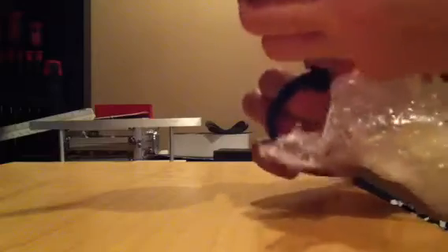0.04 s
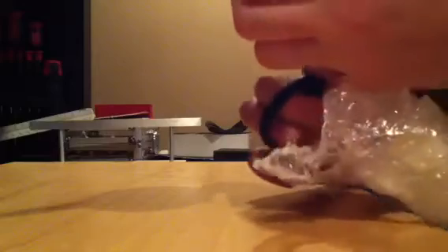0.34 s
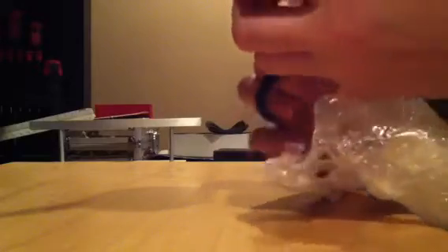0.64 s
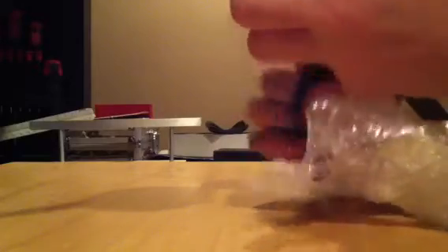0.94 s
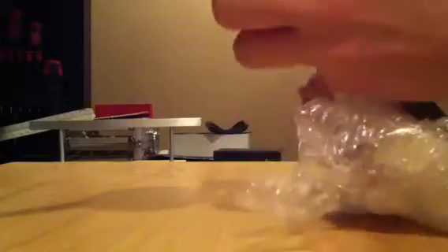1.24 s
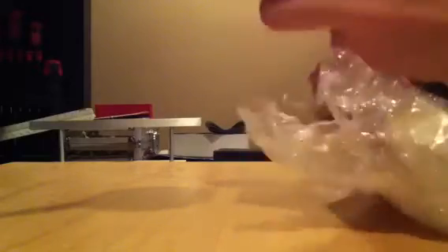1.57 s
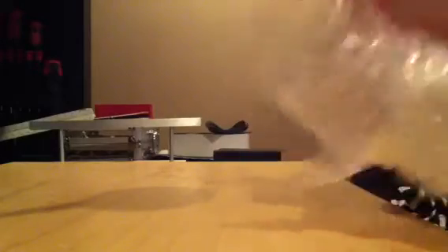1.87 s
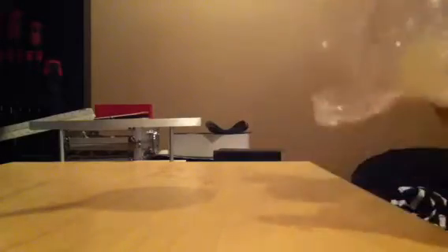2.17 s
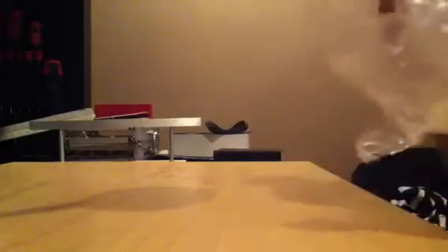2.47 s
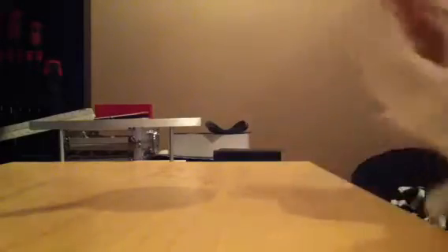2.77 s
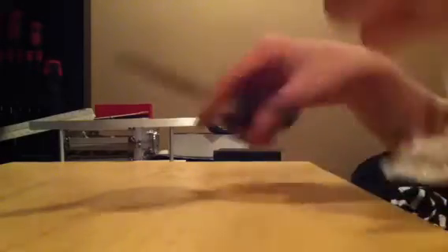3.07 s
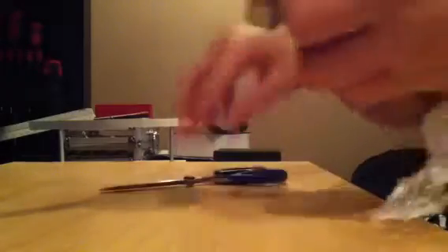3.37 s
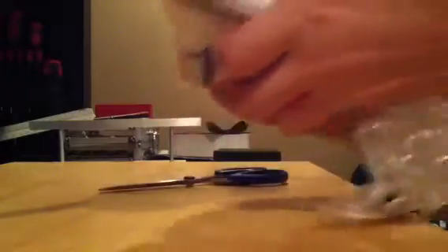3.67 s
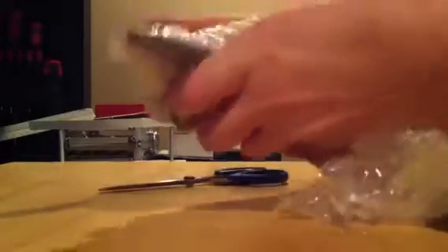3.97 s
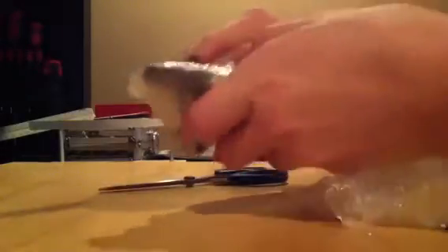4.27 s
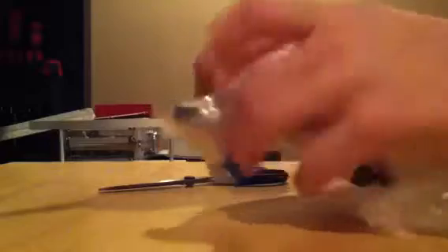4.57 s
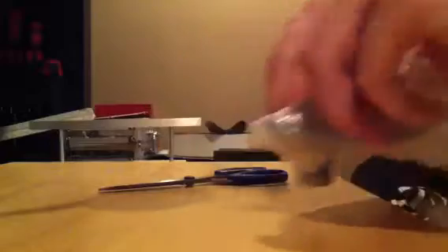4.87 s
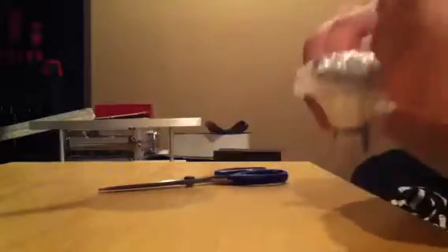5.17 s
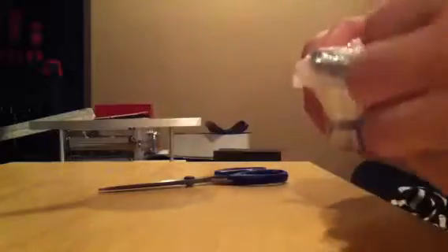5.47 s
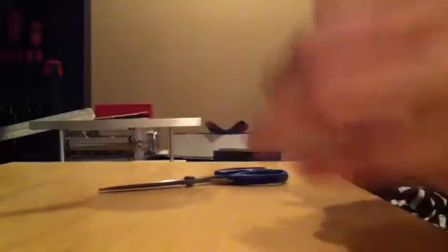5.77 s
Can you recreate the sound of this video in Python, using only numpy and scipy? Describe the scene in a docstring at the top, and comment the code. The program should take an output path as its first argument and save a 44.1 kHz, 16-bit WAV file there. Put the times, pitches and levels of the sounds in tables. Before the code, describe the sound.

Hands work plastic wrap off a metal rail, making a soft crinkle dotted with sharp snaps. Early on, the wrapped rail bumps and drags dully on a wooden table. Midway, scissors drop on the wood with a quick clinking clatter, then the crinkling returns louder and crisper. It is all close to the microphone in a small, quiet room with soft ventilation and a faint appliance whine.

```python
"""A small, quiet room with a wooden table, where hands work clear plastic wrap off a metal rail.
The film rustles with dense tiny buckles, snaps as creases pop through and rasps under the fingers;
the wrapped rail bumps and drags on the table. Midway a pair of scissors drops on the wood, its blades
clinking, and clatters to rest. Soft ventilation and a faint appliance whine lie underneath."""
import sys
import numpy as np
from scipy import signal
from scipy.fft import rfft, irfft
from scipy.io import wavfile

SR = 44100
rng = np.random.default_rng(int(sys.argv[2]) if len(sys.argv) > 2 else 0)


def log_audio(samples):
    """Write samples as a 16-bit WAV file to the path given in sys.argv[1]."""
    # one column per channel
    frames = np.atleast_2d(samples).T
    # limit to full scale, then quantise
    limited = np.clip(frames, -1, 1)
    pcm = np.round(limited * 32767).astype(np.int16)
    wavfile.write(sys.argv[1], SR, pcm)


N = 256662
T = np.arange(N) / SR
RING_T = T[:SR // 4]  # time axis of a single hit

# modes of the wooden table top: (frequency [Hz], level [dB], t60 [s])
TABLE_MODES = [(120, -12, 0.31), (165, -5.5, 0.18), (228, -6, 0.3), (269, 3.5, 0.088), (333, 4.5, 0.14),
               (416, 2, 0.078), (674, -8, 0.12), (710, -2, .1), (830, 0, 0.25), (915, -7, 0.38),
               (987, -11, 0.23), (1100, -16, 0.18), (1445, -12, 0.096), (1390, 13, 0.092),
               (1780, -11, 0.12), (1976, 14.5, 0.14), (2470, 10, 0.12)]


def undb(db):
    """Decibels to gain."""
    return 10 ** (np.asarray(db) / 20)


def unit(x):
    """Scale to rms 1."""
    return x / np.sqrt(np.mean(x ** 2))


def unit_hit(x):
    """Scale a hit to rms 1 over its first 10 ms."""
    return x / np.sqrt(np.mean(x[:SR // 100] ** 2))


def fade(t60):
    """Exponential decay, 60 dB down after t60 seconds."""
    return np.exp(-np.log(1000) * RING_T / t60)


def band(x, hz, kind, order=2):
    """Butterworth filter."""
    return signal.lfilter(*signal.butter(order, np.minimum(hz, SR / 2.2), kind, fs=SR), x)


def colour(x, points, size=4096):
    """Minimum-phase EQ through points of (frequency [Hz], gain [dB])."""
    hz, db = np.transpose(points)
    bin_hz = np.fft.rfftfreq(size, 1 / SR)
    gain = undb(np.interp(np.log(bin_hz + 1), np.log(hz), db))
    cepstrum = irfft(np.log(gain))
    cepstrum[1:size // 2] *= 2
    cepstrum[size // 2 + 1:] = 0
    return signal.fftconvolve(x, irfft(np.exp(rfft(cepstrum))))[:len(x)]


def wander(rate):
    """Random drift of rms 1 that turns `rate` times a second."""
    knots = rng.standard_normal(int(N / SR * rate) + 2)
    return unit(np.interp(T * rate, np.arange(len(knots)), knots))


def ring(modes, scatter_db):
    """Decaying modes; each point of contact weights them differently."""
    sizes = undb(scatter_db * rng.standard_normal(len(modes))) * rng.choice([-1, 1], len(modes))
    return sum(size * undb(db) * fade(t60) * np.sin(2 * np.pi * hz * RING_T)
               for size, (hz, db, t60) in zip(sizes, modes))


def burst(t60):
    """Decaying noise: countless close modes that die away together."""
    return rng.standard_normal(len(RING_T)) * fade(t60)


def ping(hz, cycles):
    """One short resonance that falls to 1/e in the given number of cycles."""
    t = RING_T[:SR // 30]
    return np.sin(2 * np.pi * hz * t) * np.exp(-hz * t / cycles)


def add(track, s, sound):
    """Mix a sound into a track at s seconds."""
    i = max(int(s * SR), 0)
    track[i:i + len(sound)] += sound[:N - i]


def room_tone():
    """A bed of soft ventilation noise with the thin, slightly wavering whine of an appliance."""
    # tone of the ventilation: (frequency [Hz], gain [dB])
    air_eq = [(25, -12), (60, -21.5), (110, -7), (150, -12), (270, 5), (400, -4.5), (600, -1.5),
              (850, -8.5), (1100, -8), (1300, -11.5), (2100, -17.5), (4000, -20.5), (13000, -58),
              (16000, -23)]
    air = unit(colour(rng.standard_normal(N), air_eq)) * undb(-58.5 + 0.23 * wander(20))
    whine_hz = 1119 + 5 * wander(50)
    whine = unit(np.sin(2 * np.pi * np.cumsum(whine_hz) / SR))
    return air + whine * undb(-68 + 1.5 * wander(30))


def hand_effort():
    """Envelope of the rustle in dB: steady handling plus tugs that build, hold and let go."""
    # how hard the hands work the film: (time [s], level [dB])
    handling = [(0.0, -71), (0.2, -71.5), (0.38, -69.5), (0.44, -61.5), (0.6, -65.5), (0.68, -61),
                (1.25, -56), (1.56, -57.5), (2.0, -55.5), (2.33, -58), (2.41, -67.5), (2.56, -60.5),
                (2.92, -68.5), (3.3, -70), (3.65, -67), (3.75, -52.5), (4.36, -49.5), (4.44, -57),
                (4.52, -46), (4.77, -56.5), (5.0, -49), (5.2, -47), (5.58, -47), (5.67, -59.5), (5.82, -59)]
    # single tugs at the film: (start [s], length [s], level [dB])
    tugs = [(0.007, 0.098, -64), (0.613, 0.15, -52.5), (0.845, 0.09, -53.5), (1.423, 0.12, -54.5),
            (1.678, 0.097, -54), (2.184, 0.16, -54), (2.443, 0.11, -54), (2.987, 0.046, -63),
            (4.079, 0.14, -47.5), (4.216, 0.13, -50.5), (4.469, 0.1, -51), (4.628, 0.14, -50),
            (4.785, 0.13, -49), (5.062, 0.099, -39.5), (5.24, 0.071, -44.5), (5.405, 0.062, -44.5),
            (5.526, 0.092, -38.5), (5.763, 0.097, -52.5)]
    attack_s, release_s = 0.021, 0.035
    power = undb(np.interp(T, *np.transpose(handling))) ** 2
    for s, length, db in tugs:
        pull = np.clip(np.minimum((T - s) / attack_s, (s + length - T) / release_s), 0, 1)
        power += (undb(db) * pull) ** 2
    return 10 * np.log10(power)


def buckles(per_band_per_s, spread_db, cycles):
    """Tiny facets of film flip, in nine bands of pitch: most are faint, a few stand out."""
    out, count = 0, int(per_band_per_s * N / SR)
    for hz in np.geomspace(900, 14000, 9):
        when, rarity, side = rng.random((count, 3)).T
        sizes = undb(spread_db * np.minimum(-np.log(1 - rarity), 4)) * np.sign(side - .5)
        flips = np.bincount((when * N).astype(int), sizes, N)
        angle, radius = 2 * np.pi * hz / SR, np.exp(-hz / cycles / SR)
        ringing = signal.lfilter([1, 0, -1], [1, -2 * radius * np.cos(angle), radius ** 2], flips)
        out = out + np.sqrt(hz) * unit(ringing)
    return unit(out)


def rustle():
    """Film slides over film in small jerks: a fine hiss full of buckles, crisper when pulled hard."""
    # tone of the film: (frequency [Hz], gain [dB])
    film_eq = [(120, -23.5), (270, -11), (400, -6), (600, -1.5), (850, -5), (1300, -3), (2700, -1.5),
               (3800, -4), (5000, -2), (6500, -3), (7500, -9), (10000, -8.5), (13500, -8.5), (16000, -13.5)]
    level_db = hand_effort()
    crackle = buckles(per_band_per_s=850, spread_db=4.6, cycles=.8)
    spectrum = rfft(colour(crackle + rng.standard_normal(N), film_eq))
    # broad folds give the body, small creases the crispness, the finest the sheen
    hz = np.fft.rfftfreq(N, 1 / SR)
    broad = 1 / (1 + (hz / 3300) ** 8)
    fine = 1 - 1 / (1 + (hz / 7100) ** 24)
    body, crisp, sheen = (unit(irfft(spectrum * share, N)) for share in (broad, 1 - broad - fine, fine))
    jerks_db = 1.4 * wander(70)
    # above an easy pace, body and sheen fall back behind the crisp middle
    easy_db = -55
    body_db = -0.5 - 0.34 * (level_db - easy_db) + wander(80)
    sheen_db = 0.5 - 0.1628 * (level_db - easy_db)
    mix = undb(body_db) * body + undb(-1) * crisp + undb(sheen_db) * sheen
    return mix * undb(level_db + jerks_db)


def ticks(per_s=25, floor_db=-55.5, spread_db=3.5):
    """Creases relax in thin, random ticks that come through when the hands rest."""
    out, count = np.zeros(N), int(per_s * N / SR)
    for when, rarity in rng.random((count, 2)):
        db = floor_db + spread_db * min(-np.log(1 - rarity), np.pi)
        add(out, when * N / SR, undb(db) * burst(t60=0.008))
    return band(out, 4500, "highpass")


def snaps():
    """A crease pops through with one sharp crack, swings its facet and shakes the rest of the sheet."""
    # popping creases: (time [s], level [dB], facet pitch [Hz], crack [dB], fizz [dB], ring [cycles])
    pops = [(0.033, -44, 1350, -5, 3, 1.2), (0.267, -42, 3740, -7, 3, 1.5),
            (0.528, -35.5, 800, 2.5, -10, 0.7), (0.9927, -30, 3600, -17, -10, 2.4),
            (1.1848, -27, 1370, -3, 3.5, 2.8), (1.4442, -25.5, 5200, -10, 1.5, 1.7),
            (1.4658, -21.5, 1200, -24, -9, 4.3), (1.735, -28, 1240, -14, -6, 2.7),
            (2.1753, -32.5, 1090, -2, -17, 0.8), (2.2781, -15.5, 2370, -2.5, -17, 1.1),
            (2.2884, -17, 1860, -2, -18, 1.3), (2.2929, -23.5, 930, 3, -8, 0.6),
            (2.3205, -27.5, 1850, -7, -16, 1.2), (2.3623, -22.5, 690, 3, -10, 1.4),
            (2.7244, -21, 1830, -9, -3, 2.7), (4.3505, -18.5, 1500, -12, -17, 1.5),
            (4.5636, -23.5, 2300, -18, -16, 1.9), (4.7245, -22, 2000, -8, -1.5, 1.2),
            (4.744, -27, 6370, -11, -9, 1.3), (5.182, -27.5, 2010, -9, -6, 1.2),
            (5.3874, -32, 1750, -2, -2, 1.6), (5.596, -17.5, 2290, -6, -13, 3),
            (5.7098, -26, 5500, -22, -12, 2.5)]
    out = np.zeros(N)
    crack = band(ping(hz=2920, cycles=0.13), 530, "highpass")
    crack = band(crack, 4900, "lowpass", order=4)
    crack /= np.abs(crack).max()
    for s, db, hz, crack_db, fizz_db, cycles in pops:
        add(out, s, undb(db) * (undb(crack_db) * crack + undb(-5) * ping(hz, cycles)))
        shiver = unit_hit(band(burst(0.039), [hz * .5, hz * 2.28], "bandpass"))
        fizz = band(undb(-4) * burst(.003) + undb(-10) * burst(.05), 4500, "highpass")
        add(out, s, undb(db) * (undb(-21.5) * shiver + undb(fizz_db) * fizz))
    return band(out, 210, "highpass")


def rail():
    """Padded by its wrap, the rail drags with a dull judder and bumps the low modes of the table."""
    # tone of the rail on the wood: (frequency [Hz], gain [dB])
    rail_eq = [(60, -33), (110, 2), (150, 10.5), (220, 1), (340, 7), (430, -4), (600, -3.5), (1200, -27)]
    # envelope of the drag: (time [s], level [dB])
    drag = [(1.063, -45), (1.19, -60.5), (1.26, -49.5), (1.66, -58), (1.75, -50.5), (1.94, -45.5),
            (2.15, -69)]
    # bumps on the table: (time [s], level [dB])
    bumps = [(1.07, -31), (1.096, -37.5), (1.736, -43), (1.85, -60)]
    drag_s, drag_db = np.transpose(drag)
    judder_db = 2 * wander(35.04)
    rumble = unit(colour(rng.standard_normal(N), rail_eq))
    moving = (T > drag_s[0]) & (T < drag_s[-1])
    out = rumble * undb(np.interp(T, drag_s, drag_db) - 4.5 + judder_db) * moving
    for s, db in bumps:
        push = unit_hit(colour(fade(0.0015), rail_eq))
        boom = unit_hit(ring(TABLE_MODES[:6], scatter_db=5))
        add(out, s, undb(db - 12.5) * (push + undb(1.5) * boom))
    return band(out, 85, "highpass")


def scuffs():
    """Fingers slide the film against the rail in short, hollow rasps."""
    # finger slides: (start [s], length [s], level [dB], pitch [Hz])
    slides = [(1.177, 0.016, -48, 1290), (2.379, 0.038, -54, 1400), (2.694, 0.043, -47, 1410),
              (2.726, 0.018, -45.5, 835), (3.846, 0.042, -43.5, 2700), (4.349, 0.0077, -34, 1650),
              (4.709, 0.029, -46.5, 1200), (4.854, 0.026, -44, 1480), (4.865, 0.019, -44.5, 570),
              (5.06, 0.07, -51, 2080), (5.551, 0.016, -36, 2400)]
    out = np.zeros(N)
    for s, length, db, hz in slides:
        rasp = unit(band(rng.standard_normal(len(RING_T)), [hz * 0.77, hz * 1.19], "bandpass"))
        swell = np.sin(np.pi * np.minimum(RING_T / length, 1))
        add(out, s, undb(db) * rasp * swell)
    return out


def scissors():
    """Dropped scissors bounce: each hit cracks and rings the handle, the blades and the table top."""
    # bounces: (time [s], knock level [dB], clink against the knock [dB], handle pitch [Hz])
    bounces = [(3.345, -21, -6, 1650), (3.3672, -23.5, 5, 2110), (3.395, -21, 1.5, 2260),
               (3.42, -30, 1.5, 1560), (3.4369, -23.5, -2, 1410), (3.4398, -22, -8, 2550),
               (3.444, -27.5, -7, 1670), (3.458, -34, -0.5, 1360), (3.4824, -29.5, -1.5, 1730),
               (3.492, -26.5, -20, 2680), (3.616, -45, -20, 1190)]
    # tone of the crack on wood: (frequency [Hz], gain [dB])
    crack_eq = [(90, -6), (130, -13), (320, 7.5), (500, -6), (800, 5.5), (1050, 6.5), (1250, -5.5),
                (1700, -1), (2500, -5), (3100, -4), (5500, -7), (8500, -12.5), (12000, -12), (16000, -20)]
    # modes of the steel blades: (frequency [Hz], level [dB], t60 [s])
    blade_modes = [(2240, 5.5, 0.067), (2350, -4, 0.087), (2740, -15, 0.28), (4820, -24, 0.047),
                   (5650, 1, 0.062), (5580, 8.5, 0.041), (6800, -16, .035), (8140, 4, 0.036),
                   (8520, 4, 0.042), (11600, -12, 0.026), (11600, -13, .025), (13460, 7, 0.022)]
    out = np.zeros(N)
    landing = 1 - np.exp(-RING_T / 0.0016)  # the two loose halves land over a millisecond or so
    push = unit_hit(band(fade(0.00064), [120, 380], "bandpass"))  # the table yields under the weight
    for s, db, clink_db, handle_hz in bounces + rocking():
        crack = unit_hit(band(colour(burst(.027) * landing, crack_eq), [520, 4500], "bandpass"))
        chatter = unit_hit(band(colour(burst(.036) * landing, crack_eq), 5200, "highpass", order=3))
        boom = unit_hit(ring(TABLE_MODES[:6], scatter_db=3.5))
        clack = unit_hit(ring(TABLE_MODES[6:], scatter_db=5))
        blades = unit_hit(ring(blade_modes, scatter_db=2))
        handle = unit_hit(ping(handle_hz, cycles=2.8) * landing[:SR // 30])
        knock = undb(-2.5) * crack + undb(-15.5) * clack
        thud = undb(-3.5) * boom + undb(-5) * push
        thud_db = -14.5 + 6 * (s - bounces[0][0])  # grows as the scissors lie flatter
        # the blades ring mostly when they land first
        clink = undb(-4) * chatter + undb(.5 * clink_db - 7.5) * blades
        add(out, s, undb(db) * (knock + undb(thud_db) * thud + undb(clink_db) * clink))
        add(out, s + 0.00041, undb(db - 6) * handle)
    return out


def rocking(count=7, start_s=3.5055, gap_s=0.0118, jitter_s=0.001, fall_db=6.5, clink_db=-15.5):
    """The scissors rock to rest in quick, dull, fading taps, given as rows like the bounces."""
    step = np.arange(count)
    late, detune = rng.standard_normal((count, 2)).T
    s = start_s + gap_s * step + jitter_s * late
    db = -32.5 - fall_db * step / step[-1]
    handle_hz = 1660 * np.exp(0.25 * detune)
    return list(zip(s, db, np.full(count, clink_db), handle_hz))


def room(x, wet_db, low_t60, high_t60):
    """Nearby walls answer after a few milliseconds with a dark and a bright tail."""
    dark = band(burst(low_t60), 5700, "lowpass")
    bright = band(burst(high_t60), 2700, "highpass")
    onset = np.clip((RING_T - .004) / 0.0031, 0, 1)
    tail = (dark + undb(-2.5) * bright) * onset
    return x + undb(wet_db) * signal.fftconvolve(x, tail / np.sqrt(np.sum(tail ** 2)))[:N]


def scene():
    """Film, rail and scissors, all within arm's reach, in mono over the room tone."""
    film = rustle() + ticks() + snaps() + scuffs()
    unwrapping = room(film + rail(), wet_db=-13, low_t60=0.19, high_t60=0.38)
    clatter = room(scissors(), wet_db=-13, low_t60=0.27, high_t60=0.097)
    return (unwrapping + clatter + room_tone())[None]


def record(dry):
    """A small microphone: thin deep bass and a steep cut at the top."""
    top_cut = signal.ellip(10, .2, 70, 16000, fs=SR, output="sos")
    return signal.sosfilt(top_cut, band(dry, 51, "highpass", order=1))


dry = scene()
out = record(dry)
log_audio(out)
```